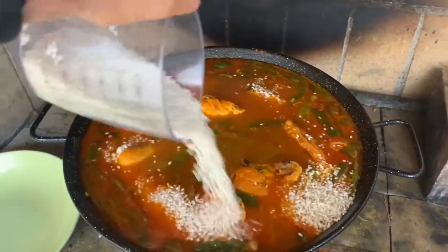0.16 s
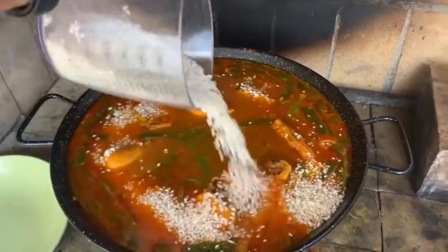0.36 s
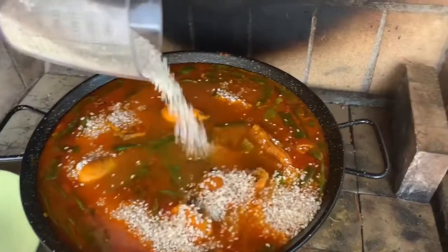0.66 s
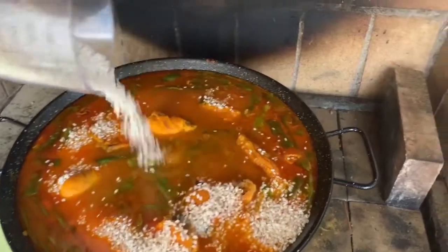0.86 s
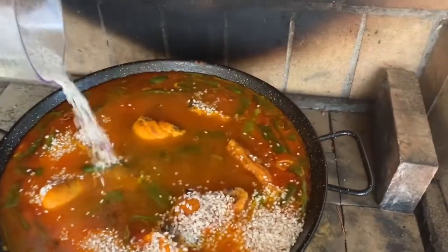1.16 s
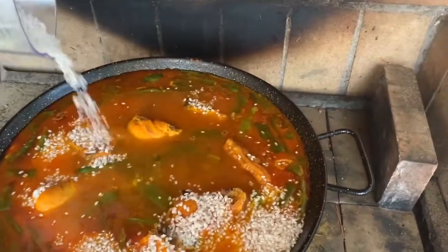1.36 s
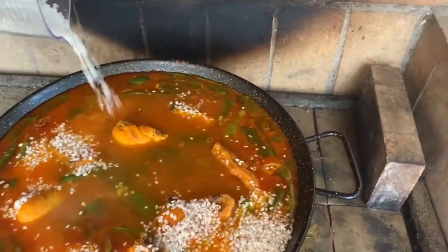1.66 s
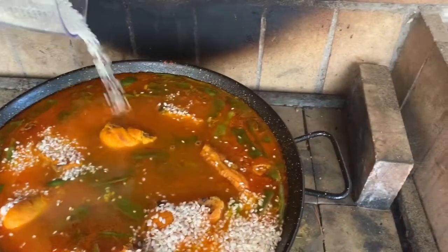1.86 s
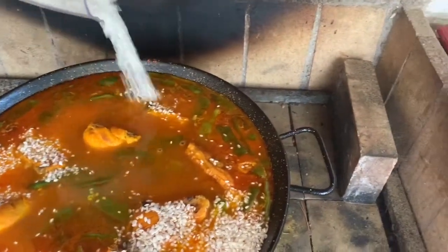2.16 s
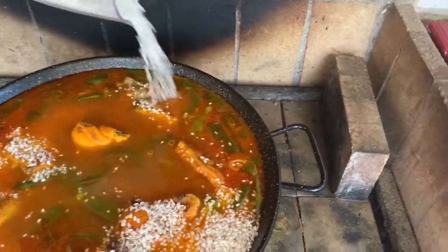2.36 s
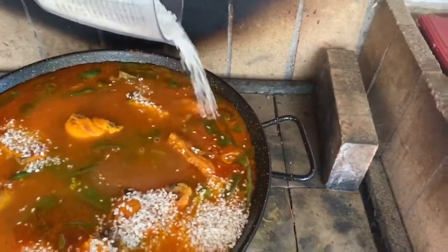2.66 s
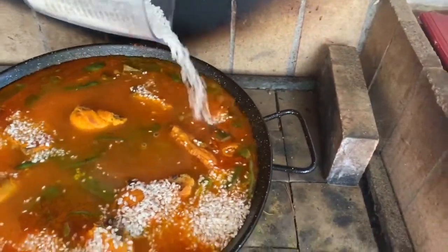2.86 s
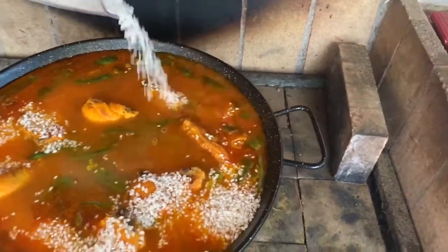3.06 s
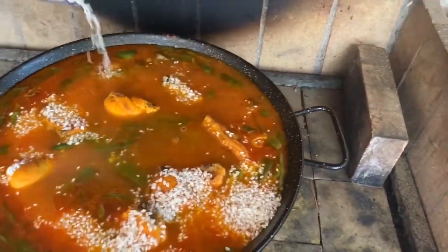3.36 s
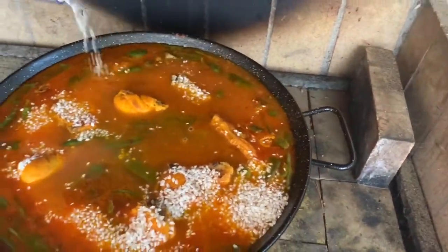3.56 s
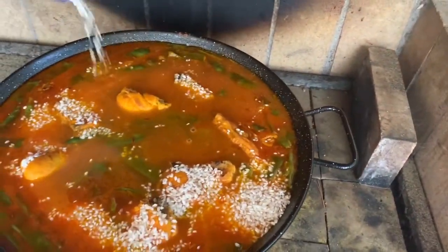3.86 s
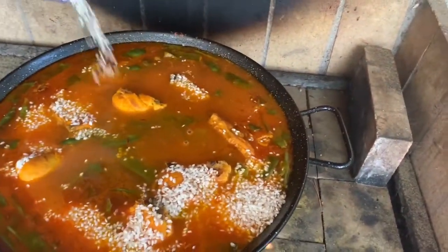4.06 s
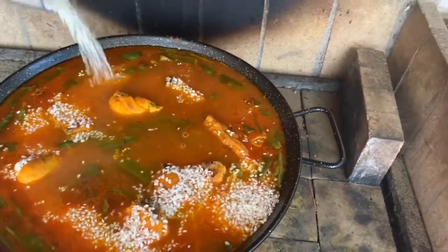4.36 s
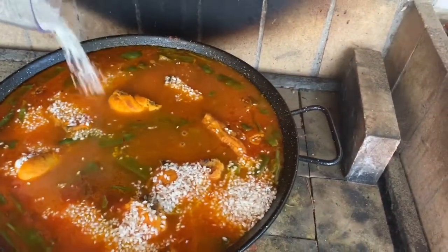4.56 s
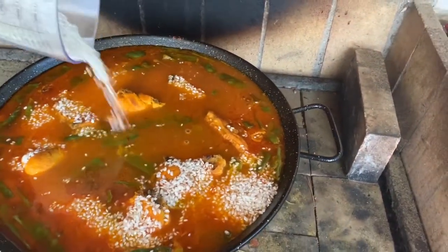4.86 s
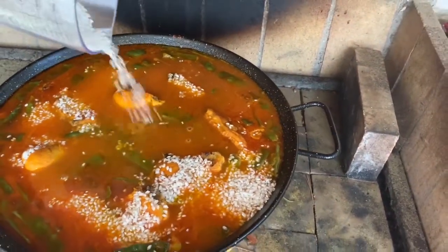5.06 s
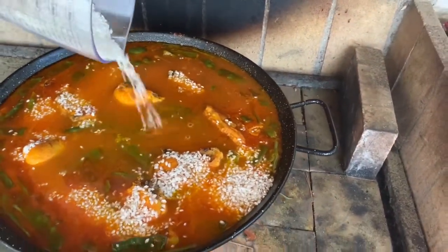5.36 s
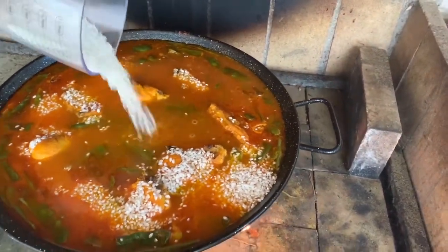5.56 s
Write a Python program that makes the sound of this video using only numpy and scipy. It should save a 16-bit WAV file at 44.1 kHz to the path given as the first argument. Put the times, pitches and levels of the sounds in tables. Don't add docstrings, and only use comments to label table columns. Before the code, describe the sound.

Dry rice pours steadily from a plastic jug into a pan of simmering broth, a crisp fluctuating hiss over low, fluttering fire rumble.

```python
import sys
import numpy as np
from scipy import signal
from scipy.fft import rfft, irfft, dct, next_fast_len
from scipy.io import wavfile
from scipy.ndimage import uniform_filter1d, map_coordinates

SR = 44100
rng = np.random.default_rng(int(sys.argv[2]) if len(sys.argv) > 2 else 0)


def inscribe(sig):
    pcm = np.round(np.clip(np.atleast_2d(sig).T, -1, 1) * 32767)
    wavfile.write(sys.argv[1], SR, pcm.astype(np.int16))


def field_ratio(decibels):
    return 10 ** (np.asarray(decibels, dtype=float) / 20)


N = 251987

# start_s, flow_db, share landing in broth_db
STREAM = [(0.0, -39.5, -12), (0.33, -45, -8.5), (0.49, -43.5, -11), (1.0, -42.5, -1.5),
          (1.16, -48.5, -10.5), (1.7, -42.5, -5), (1.73, -49, -1.5), (2.13, -36, -8), (2.81, -49.5, -8.5),
          (3.08, -42.5, -5.5), (3.4, -48, -12.5), (3.53, -59.5, -3.5), (3.94, -43.5, -4.5),
          (4.42, -40.5, -3), (4.86, -51, -0.5), (4.9, -47.5, -6), (5.44, -44.5, -5), (5.71, -39.5, -9.5)]
# start_s, rise_db, length_s
SURGES = [(0.389, 5, 0.29), (0.474, 3, 0.066), (0.583, 3.5, 0.12), (0.727, 3, 0.041), (0.071, -4, 0.084),
          (0.16, 1.5, 0.044), (0.848, 1.5, 0.026), (0.927, 1, 0.04), (2.902, 1, 0.019), (4.56, 1.5, 0.066),
          (4.177, 0, 0.04), (1.327, 2.5, 0.076), (1.407, 3.5, 0.084), (1.557, 4, 0.016),
          (1.636, -0.5, 0.054), (1.96, 1, 0.05), (2.288, 3.5, 0.11), (2.672, 2.5, 0.26), (3.08, 4, 0.097),
          (3.694, 3.5, 0.013), (4.385, 2, 0.11), (5.123, 2, 0.023), (5.473, 3.5, 0.15)]
# start_s, rise_db, length_s
HEAP_PATTER = [
    (.6, 3.5, 0.11),
    (.645, -2, .03),
    (0.934, 6.5, 0.036),
    (1.684, 3, 0.038),
    (2.327, 1.5, .05),
    (3.023, 5.5, 0.053),
    (4.207, 3, 0.21),
    (5.053, 5, 0.023),
    (5.393, 2.5, 0.027),
    (5.441, 4, 0.064),
]
# start_s, rattle_db, length_s
JUG_SHAKES = [(0.539, -48, 0.027), (0.631, -52, 0.12), (1.89, -60, 0.23), (2.153, -59, 0.34),
              (2.797, -60.5, 0.13), (3.088, -56, 0.042), (3.144, -59, 0.17), (3.694, -51.5, 0.026),
              (3.894, -62.5, 0.75), (4.725, -54.5, 0.098), (4.777, -53, 0.054), (4.854, -45.5, 0.038),
              (4.924, -60, 0.083), (5.16, -56.5, 0.27), (5.23, -62.5, 0.18), (5.339, -47, 0.016),
              (5.382, -56, 0.078)]
# frequency_hz, density_db per Hz
DRY_COLOUR = [(3000, -19.5), (6000, -15.5), (8000, -3.5), (10500, -0.5), (13000, 2), (15700, 2)]
# frequency_hz, density_db per Hz
SPLASH_COLOUR = [(2200, -20), (3400, -1), (5000, -1), (6500, 1.5), (9000, -4), (14000, -10.5)]
# frequency_hz, density_db per Hz
PLOP_COLOUR = [(700, -44), (1500, -9), (2200, 1), (3100, 7), (4200, -17.5)]
# pitch_hz, width_hz, level_db
PAN_MODES = [(2150, 60, 1), (2840, 40, 2), (3310, 40, 1), (3820, 60, 2), (4620, 50, 3), (5460, 60, 1),
             (6380, 60, 3)]
# pitch_hz, width_hz
JUG_HOLLOW = (1390, 230)
# start_s, flame_db, wind_db, flutter over flame_db
FIRE = [(0.0, -38.5, -60, -8), (0.38, -58, -59, 1), (1.02, -57, -61.5, 0.5), (1.27, -46, -49.5, -4.5),
        (1.35, -46, -44.5, -9.5), (1.65, -60.5, -77, -7), (1.92, -59, -52.5, -0.5), (2.1, -56, -63, -4.5),
        (2.53, -59, -58, -4.5), (2.88, -57.5, -42, -10), (3.28, -58, -58.5, -2.5), (3.58, -48.5, -57, -1.5),
        (4.09, -54, -50, 4), (4.5, -48, -66.5, -5.5), (4.55, -60, -57, -6), (5.26, -57.5, -58.5, -5),
        (5.52, -52, -56, 0.5), (5.71, -67, -60, -6)]
# start_s, peak_db, flutter_db, length_s
PUFFS = [(0.04, -52, -12, 0.044), (0.096, -49, -6, 0.018), (0.171, -40.5, -9, 0.036),
         (0.288, -33, -6.5, 0.042), (0.303, -41, -1.5, 0.026), (0.436, -33, -6, 0.045),
         (0.541, -38.5, -13, 0.059), (0.654, -28.5, -13, 0.046), (0.682, -27.5, -7.5, 0.051),
         (0.924, -54, -5, 0.082), (1.026, -27, -10.5, 0.015), (1.125, -38, -6, 0.026),
         (1.176, -40, -3, 0.047), (1.285, -29, -24, 0.064), (1.383, -27.5, -22, 0.045),
         (1.873, -31, -7.5, 0.075), (2.024, -39, -0.5, 0.04), (2.103, -30.5, -16, 0.054),
         (2.21, -31, -9, 0.046), (2.373, -36.5, -5.5, 0.07), (2.694, -35.5, -6, 0.065),
         (2.867, -28, -20, 0.053), (2.972, -36.5, -5, 0.023), (3.269, -41.5, -3.5, 0.029),
         (3.371, -47, -4, 0.027), (3.445, -37, -7.5, 0.026), (3.485, -36, -5, 0.051),
         (3.548, -46.5, 15.5, 0.074), (3.642, -43, -6, 0.067), (3.702, -38, 4, 0.027),
         (3.755, -58, -7, 0.076), (3.835, -27, -7.5, 0.041), (3.916, -38, -0.5, 0.012),
         (3.98, -31.5, -1.5, 0.098), (4.05, -35, -16, 0.03), (4.083, -47, 5, 0.023),
         (4.188, -24.5, -11, 0.064), (4.434, -30, -2, 0.085), (4.525, -28, -7.5, 0.045),
         (4.394, -45, -10, 0.017), (4.659, -49.5, 17.5, 0.048), (4.735, -33.5, 1, 0.082),
         (4.843, -39, -10, 0.013), (4.911, -37, -10.5, 0.056), (5.089, -37.5, -3.5, 0.1),
         (5.283, -33, -2.5, 0.026), (5.466, -36, -8.5, 0.13), (5.578, -29.5, -4.5, 0.042)]
# pitch_hz, width_hz
HEARTH_GAP = (130.3, 53)
# frequency_hz, density_db per Hz
ROAR_COLOUR = [(20, -15), (40, -6), (63, 8), (85, 2), (110, -23.5), (160, -33.5)]
# frequency_hz, density_db per Hz
FLUTTER_COLOUR = [(100, -63), (200, -0.5), (310, -3), (450, -3), (560, -8), (700, -9.5), (1100, -9),
                  (2500, -28)]
# start_s, level_db
BOIL_LEVEL = [
    (0, -65.5),
    (.5, -60),
    (1.4, -73),
    (3.35, -74),
    (3.5, -59),
    (4.25, -53.5),
    (4.35, -68),
    (4.5, -61),
    (4.9, -66.5),
    (5.71, -63),
]
# frequency_hz, density_db per Hz
BOIL_COLOUR = [(150, -26), (280, -4.5), (400, -0.5), (550, -1.5), (680, -16), (1000, -18), (1600, -38)]
# frequency_hz, density_db per Hz
AIR_COLOUR = [(30, -25), (100, 7.5), (400, -19.5), (900, 3), (3000, -5.5), (15000, -40)]
# start_s, peak_db, pitch_hz
PLINKS = [(0.157, -43, 4040), (0.174, -34, 6940), (0.4, -48, 6050), (0.8754, -28.5, 4640),
          (1.3278, -34, 4880), (1.4286, -32, 6430), (1.5673, -41, 6200), (1.6462, -34, 7600),
          (1.702, -33, 6850), (1.8645, -47, 6900), (1.915, -43.5, 4530), (1.9689, -26, 7600),
          (2.043, -27, 7200), (3.029, -44, 7300), (3.249, -45, 6930), (3.5357, -55, 4540),
          (3.5984, -39, 3940), (3.7005, -41, 3690), (3.8227, -45, 6910), (4.0684, -32.5, 5580),
          (4.178, -32, 3950), (4.5705, -29, 7240), (4.7197, -33.5, 5380), (4.809, -45.5, 4970),
          (4.8706, -41, 4500), (5.021, -32, 7300), (5.0569, -45, 6350), (5.0926, -38, 6740),
          (5.1327, -32, 6240)]
# start_s, peak_db, pitch_hz, smear of noise_db
GRAIN_TICKS = [(0.175, -39, 11800, -23), (0.485, -29, 10700, -22), (0.5407, -23, 10800, -28),
               (0.5413, -20, 10900, -20), (0.606, -32, 10650, -22), (0.6297, -17.5, 9700, -11.5),
               (0.7246, -23.5, 10800, -10), (0.843, -31, 10800, -14), (0.894, -27, 11000, -16),
               (0.9282, -23, 10400, -24), (0.9338, -37, 11200, -15), (0.9675, -25.5, 10300, -9.5),
               (1.2353, -29, 12600, -18), (1.3647, -34, 11300, -11), (1.4401, -30, 10000, -22),
               (1.4636, -39, 10200, -23), (1.476, -30, 11600, -18), (1.5324, -28, 10800, -18),
               (1.5678, -24, 10800, -19), (1.6067, -50, 10100, -23), (1.608, -25, 10200, -17),
               (1.6437, -29, 10900, -13), (1.6871, -26.5, 11000, -14.5), (1.7968, -27, 10200, -23),
               (1.8964, -34, 10600, -20), (1.9131, -35, 9830, -17), (1.962, -30.5, 10600, -19),
               (2.0467, -28, 10700, -24), (2.049, -27, 10800, -17), (2.243, -29, 15000, -9),
               (2.31, -30, 11300, -18), (2.335, -25, 10500, -12), (2.3565, -27.5, 10800, -7),
               (2.5504, -27, 10900, -20), (2.581, -29.5, 15500, -16.5), (2.6489, -26, 15600, -23),
               (2.851, -25, 11430, -29), (2.939, -31, 15500, -17), (2.9807, -30, 10900, -13),
               (3.029, -26, 11200, -8.5), (3.0779, -36, 10800, -24), (3.0824, -31, 11400, -11),
               (3.1564, -23.5, 10800, -9), (3.249, -32, 10400, -20),
               (3.3207, -27, 12200, -19), (3.511, -34, 12100, -19.5), (3.6685, -43, 11500, -24),
              (3.6972, -34, 10960, -30), (3.7239, -30, 12900, -25), (3.7239, -26.5, 15000, -18),
              (3.7703, -33.5, 12000, -14), (3.7843, -28, 10900, -14.5), (3.8505, -37, 10800, -29),
              (3.8675, -37, 10800, -24), (3.885, -36, 11900, -10), (3.9582, -21.5, 11660, -20),
              (4.0421, -28, 11900, -22), (4.0452, -35, 11800, -28), (4.071, -19, 15200, -25),
              (4.136, -43, 9800, -22), (4.185, -31, 15600, -26), (4.2053, -21, 12100, -20),
              (4.3857, -25.5, 15300, -11.5), (4.614, -20, 12240, -16), (4.7615, -36, 10200, -10),
              (4.8882, -44, 14500, -25), (4.8879, -26, 9600, -18), (4.9074, -31, 11600, -7.5),
              (4.9501, -31.5, 10700, -11), (4.9985, -39, 14400, -20), (4.9985, -32, 11000, -29),
              (5.0212, -28, 10800, -18), (5.0583, -28, 14300, -14), (5.0576, -27.5, 10650, -14.5),
              (5.1013, -31, 10500, -23), (5.1327, -21.5, 10570, -8.5), (5.204, -28, 12140, -14),
              (5.264, -37, 15800, -20), (5.3043, -35.5, 10200, -8), (5.3525, -26, 10100, -24),
              (5.3822, -35, 10300, -9), (5.3961, -28.5, 10200, -11), (5.404, -24, 12300, -25),
              (5.4373, -33, 10840, -10), (5.4448, -24.5, 11120, -13), (5.4754, -26, 10100, -14),
              (5.5063, -26, 14600, -12), (5.5138, -24, 10150, -16)]
# start_s, peak_db, pitch_hz, t60_s
KNOCKS = [(0.4, -35.5, 2417, 0.087), (0.718, -32.5, 1364, 0.063), (1.8713, -26.5, 2600, 0.047),
          (2.13, -36, 1310, 0.057), (2.792, -36, 1600, 0.055), (2.891, -26.5, 2550, 0.032),
          (3.097, -34, 1435, 0.052), (3.698, -38, 1164, 0.045), (4.0047, -41, 1060, 0.081),
          (4.6658, -30.5, 2026, 0.042), (4.96, -37, 1990, 0.099), (5.022, -37, 1430, 0.035),
          (4.7827, -36, 1518, 0.05), (4.8655, -33.5, 1395, 0.064), (5.148, -36, 2420, 0.067),
          (5.3148, -30, 2450, 0.082), (5.35, -29.5, 1410, 0.056), (5.427, -47, 1370, 0.13)]
# start_s, length_s, level_db, pitch_hz, width_hz
SPLAT = (3.59, .05, -51, 4000, 700)
# start_s, level_db
SCATTER = [(0, 2.5), (.9, 0), (1.05, -3), (1.75, -1.5), (1.9, 0), (2.35, 0), (2.45, -1.5), (2.65, 4.5),
           (3.2, 0), (3.75, 0), (4, -2.5), (4.7, -2.5), (4.85, 2.5), (5.71, 2)]
# frequency_hz, lead_cycles
LEFT_LEAD = [(0, 0), (700, -.12), (1400, .19), (3000, .5), (4500, 1), (6400, 1), (8520, 1.5), (11000, 2),
             (13400, 2.5), (15900, 3)]
# frequency_hz, likeness (0-1)
LIKENESS = [(40, 0.89), (130, 0.97), (300, 0.95), (700, 0.5), (1400, 0.65), (2200, 0.55), (3100, .62),
            (5500, .25), (7500, 0.89), (15000, .88)]
BAND_EDGES = np.r_[0:40:4, 40:96:8, 96:144:12, 144:176:16, 176:216:20, 216:264:24, 264:320:28, 320:1024:32]
# frequency_hz, step_db
ROUNDING_STEP = [(100, -22), (500, -9), (1300, -1.5), (2000, 4), (4500, 6.5), (6500, 5), (8500, 2),
                 (11000, -.5), (15000, .5)]
# frequency_hz, depth_db
VANISH_DEPTH = [(800, 7), (4000, 7), (5600, 10), (7000, 5), (16000, 5)]
SHARP_TICKS = [.968, 1.568, 1.6, 1.96, 2.851, 3.156, 3.668, 3.697, 3.735, 4.075, 4.907, 4.995, 5.058, 5.133,
               5.397, 5.425]


def unit(x):
    return x / np.sqrt(np.mean(x ** 2) + 1e-20)


def along(points, hz):
    f, v = np.transpose(points)
    return np.interp(np.log(hz + 1), np.log(f + 1), v)


def curves(rows):
    s, *columns = np.transpose(rows)
    return [np.interp(np.arange(N) / SR, s, column) for column in columns]


def wobble(rate):
    return map_coordinates(rng.standard_normal(2000), [np.arange(N) * min(rate, 300) / SR])


def swell(s, length):
    u = np.clip(np.arange(N) / SR - s, 0, None) / max(length / 3, .006)
    return u * np.exp(1 - u)


def swells_db(rows):
    return sum(db * swell(s, length) for s, db, length in rows)


def noise():
    return rng.standard_normal((2, N))


def filtered(x, response):
    m = next_fast_len(N + 8192)
    return irfft(rfft(x, m) * response(np.fft.rfftfreq(m, 1 / SR)), m)[..., :N]


def coloured(x, spectrum):
    return unit(filtered(x, lambda hz: field_ratio(along(spectrum, hz))))


def resonance(f, hz, width):
    return 1j * f * width / (hz * hz - f * f + 1j * f * width)


def patchy(depth_db):
    z = signal.stft(noise(), nperseg=512)[2]
    field = uniform_filter1d(rng.standard_normal(z.shape[1:]), size=4, axis=0)
    field = uniform_filter1d(field, size=10, axis=1)
    return unit(signal.istft(z * field_ratio(depth_db * unit(field)), nperseg=512)[1][:, :N])


def grains(count, hz, spread, cycles, size_db, size=64):
    u = rng.random((2, count, 2))
    pitch = np.clip(hz * np.exp(spread * rng.standard_normal((2, count, 1))), 150, 16000)
    turns = pitch * np.arange(size) / SR
    strength = field_ratio(np.minimum(-size_db * np.log(1 - u[..., 1:]), 14))
    waves = strength * np.sin(2 * np.pi * turns) * np.exp(-turns / cycles)
    at = (u[..., :1] * N).astype(int) + np.arange(size)
    return unit(np.array([np.bincount(at[c].ravel(), waves[c].ravel(), N + size)[:N] for c in (0, 1)]))


def ports(pair, lead):
    def blend(hz):
        turn = np.arccos(np.clip(along(LIKENESS, hz), 0, 1)) / 2
        return np.array([np.cos(turn), np.sin(turn)])

    def early_left(hz):
        half = lead * np.pi * np.interp(hz, *np.transpose(LEFT_LEAD))
        return np.exp(1j * np.outer([1, -1], half))

    mid, side = filtered(pair, blend)
    return filtered(np.array([mid + side, mid - side]), early_left)


def stream():
    flow_db, share_db = curves(STREAM)
    surge_db = swells_db(SURGES)
    heap_db = swells_db(HEAP_PATTER)
    clumps = wobble(25)

    ticks = grains(count=14000, hz=10800, spread=0.3, cycles=1.38, size_db=2.5, size=40)
    dry_rice = coloured(ticks + 1.1 * noise(), DRY_COLOUR)
    dry_db = flow_db + surge_db + heap_db + 4.0 + 2.0 * clumps + 1.5 * wobble(70)

    splash = splashes(hz=5044, spectrum=SPLASH_COLOUR, cycles=13, size=200)
    splash_db = flow_db + share_db + 2.01 * surge_db - 1.5 + 2.3 * clumps + 1.9 * wobble(30)
    plop = splashes(hz=2471, spectrum=PLOP_COLOUR, cycles=9, size=240)
    plop_db = flow_db + 0.8 * share_db + 2.3 * surge_db - 7 + 2.1 * wobble(22)

    rattle = grains(count=2500, hz=1310, spread=0.46, cycles=0.36, size_db=2.5, size=200)
    hollow = unit(filtered(rattle, lambda f: resonance(f, *JUG_HOLLOW) ** 2))
    shaking = field_ratio(flow_db - 33.5)
    for s, db, length in JUG_SHAKES:
        shaking = shaking + field_ratio(db) * swell(s, length)
    jug = shaking * field_ratio(3 * wobble(40)) * hollow
    return field_ratio(dry_db) * dry_rice + field_ratio(splash_db) * splash + field_ratio(plop_db) * plop + jug


def splashes(hz, spectrum, cycles, size):
    bubbles = grains(count=9000, hz=hz, spread=.4, cycles=cycles, size_db=3.0, size=size)

    def steel(f):
        return 1 + sum(field_ratio(db) * resonance(f, centre, width) for centre, width, db in PAN_MODES) / 2

    return coloured(filtered(bubbles + 1.4 * patchy(depth_db=3.5), steel), spectrum)


def fire():
    flame_db, wind_db, flutter_db = curves(FIRE)
    low = field_ratio(flame_db - 2.0 + 2.2 * wobble(27) + 2.0 * wobble(45))
    high = low * field_ratio(flutter_db + 1.8 * wobble(36))
    for s, db, rel_db, length in PUFFS:
        puff = field_ratio(db) * np.sqrt(swell(s, 0.64 * length))
        low = low + field_ratio(-10.0) * puff
        high = high + field_ratio(rel_db - 9.0) * puff

    boom = unit(filtered(noise(), lambda f: resonance(f, *HEARTH_GAP) ** 2))
    roar = field_ratio(wind_db + 5.5 + 2.7 * wobble(15)) * coloured(noise(), ROAR_COLOUR)
    licks = grains(count=1500, hz=332.3, spread=.4, cycles=3, size_db=1.5, size=600)
    flutter = coloured(patchy(depth_db=2.0) + .5 * licks, FLUTTER_COLOUR)
    flames = roar + low * boom + high * flutter

    def placed(f):
        return field_ratio(np.outer([1, -1], 1.9 * (f > 450))) / (1 + (f / 800) ** 4)

    return filtered(ports(flames, lead=0), placed)


def boil():
    bubbles = grains(count=2500, hz=418.3, spread=.3, cycles=3.2, size_db=3.0, size=600)
    level = field_ratio(curves(BOIL_LEVEL)[0] + 1.6 * wobble(20))
    return ports(level * coloured(bubbles + noise(), BOIL_COLOUR), lead=0)


def outdoor_air():
    return field_ratio(-66.5) * coloured(noise(), AIR_COLOUR)


def place(out, s, sound):
    out[:, round(s * SR):][:, :len(sound)] += sound


def plinks():
    out, t = np.zeros((2, N + 4000)), np.arange(4000) / SR
    for s, db, hz in PLINKS:
        envelope = field_ratio(db + 7 - 60 * t / 0.0046) * (1 - np.exp(-t / 0.00018))
        place(out, s, envelope * np.sin(2 * np.pi * hz * t * (1 + 12 * t)))
    return out[:, :N]


def single_ticks():
    out, t = np.zeros((2, N + 4000)), np.arange(4000) / SR
    half_s, lead_in_s = .00032, .003
    for s, db, hz, smear_db in GRAIN_TICKS:
        snap = np.sin(2 * np.pi * hz * t) * np.exp(-((t - lead_in_s) / half_s) ** 2)
        smear = signal.lfilter([1, 0, -1], [1, 0, .6], rng.standard_normal(len(t)))
        smear = smear * field_ratio(smear_db - 60 * t / 0.03) * np.minimum(t / lead_in_s, 1) ** 2
        place(out, s - lead_in_s + half_s, field_ratio(db + 4) * (.6 * snap + field_ratio(1.5) * smear))
    too_small_for_lows = signal.butter(4, 6500, 'high', fs=SR, output='sos')
    return signal.sosfilt(too_small_for_lows, out)[:, :N]


def knocks():
    out, t = np.zeros((2, N + 4000)), np.arange(4000) / SR
    for s, db, hz, t60 in KNOCKS:
        ring = np.sin(2 * np.pi * hz * t)
        ring += 0.34 * np.sin(2 * np.pi * 0.77 * hz * t + 1)
        ring += 0.67 * np.sin(2 * np.pi * 1.2 * hz * t + 2)
        envelope = field_ratio(db - 7.5 - 60 * t / max(t60, .005)) * (1 - np.exp(-t / 0.0011))
        place(out, s, envelope * ring)
    return out[:, :N]


def splat():
    s, length, db, hz, width = SPLAT
    u = np.clip(np.arange(N) / SR - s, 0, None) / (length / 2)
    rush = unit(filtered(noise(), lambda f: resonance(f, hz, width) ** 2))
    return field_ratio(db) * u * np.exp(1 - u) * rush


def sway(pair):
    slope = filtered(pair, lambda hz: 2j * np.pi * hz)
    return pair + np.outer([.5, -.5], 3e-6 * wobble(26)) * slope


def scene():
    near, scattered = stream() + plinks() + single_ticks() + knocks() + splat()
    rice = np.array([near, scattered * field_ratio(curves(SCATTER)[0])])
    return sway(ports(rice, lead=1)) + fire() + boil() + outdoor_air()


def coarsen_stereo(x):
    hop = 1024
    front, count = 2 * hop - 835, N // hop + 3
    pair = np.pad([x[0] + x[1], x[0] - x[1]], ((0, 0), (front, 3 * hop)))
    pair = pair[:, :(count + 1) * hop].reshape(2, -1, hop)

    soft = uniform_filter1d(rng.standard_normal(count + 1), size=5)[:, None] > .25
    sine_rise = np.sin(np.pi * (np.arange(hop) + .5) / hop / 2)
    steep_rise = signal.windows.kaiser_bessel_derived(2 * hop, 4 * np.pi)[:hop]
    rise = np.where(soft, sine_rise, steep_rise)
    up, down = rise[:-1], rise[1:, ::-1]

    a, b = np.split(pair[:, :-1] * up, 2, axis=2)
    c, d = np.split(pair[:, 1:] * down, 2, axis=2)
    folded = np.concatenate([-c[..., ::-1] - d, a - b[..., ::-1]], axis=2)
    z = dct(folded, type=4, norm='ortho')

    band = np.searchsorted(BAND_EDGES, np.arange(hop), 'right') - 1
    hz = np.asarray(BAND_EDGES) * SR / hop / 2
    power = np.add.reduceat(z ** 2, BAND_EDGES, axis=2) / np.diff(np.r_[BAND_EDGES, hop])
    weak = (power < field_ratio(-2 * along(VANISH_DEPTH, hz)) * power[::-1]) & (hz > 800)
    level = np.sqrt(abs(uniform_filter1d(power.mean(axis=0), size=3, axis=1))) + 1e-9
    uneven_db = 3.5 * rng.standard_normal(power.shape)
    step = (level * field_ratio(along(ROUNDING_STEP, hz) + uneven_db))[..., band]
    rounded = np.sign(z) * step * np.floor(abs(z / step) ** .75 + .4054) ** (4 / 3)
    rounded = rounded * ~weak[..., band]

    fine = np.isin(np.arange(count), np.round((np.array(SHARP_TICKS) * SR + front) / hop) - 1)
    kept = np.where(fine[:, None], z, rounded)
    u, v = np.split(dct(kept, type=4, norm='ortho'), 2, axis=2)
    first = np.concatenate([v, -v[..., ::-1]], axis=2) * up
    second = np.concatenate([-u[..., ::-1], -u], axis=2) * down
    first[:, 1:] += second[:, :-1]
    mid, side = first.reshape(2, -1)[:, front:front + N] / 2
    return np.array([mid + side, mid - side])


def band_limit(x):
    return signal.sosfilt(signal.butter(12, 17090, fs=SR, output="sos"), x)


def record(dry):
    def shade(hz):
        middle_treble_db = np.exp(-np.log((hz + 1) / 5200) ** 2 / 0.11)
        return (hz < 15780) * field_ratio(np.outer([-1, 1], middle_treble_db))

    mix = coarsen_stereo(filtered(dry, shade))
    return band_limit(mix)


dry = scene()
out = record(dry)
inscribe(out)
```